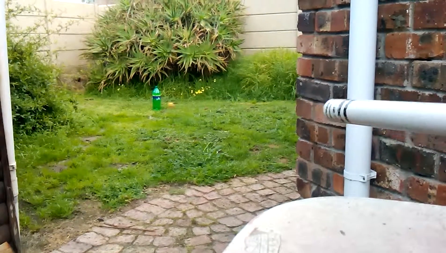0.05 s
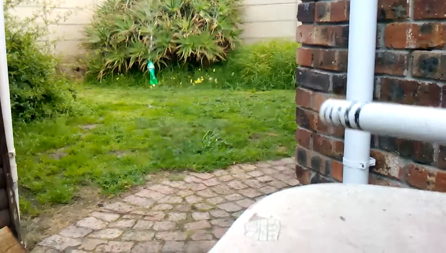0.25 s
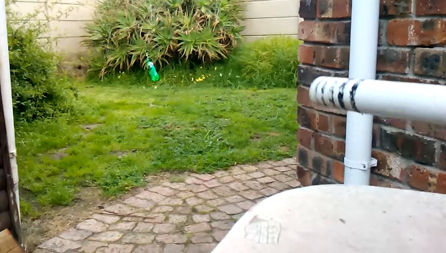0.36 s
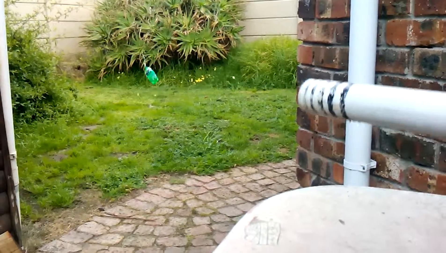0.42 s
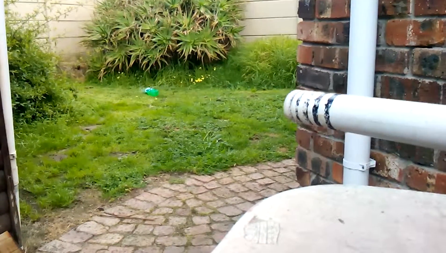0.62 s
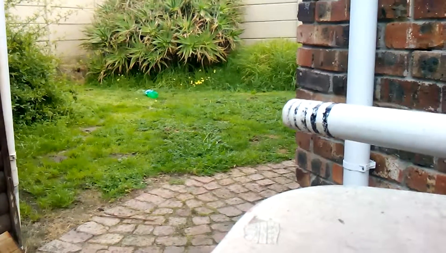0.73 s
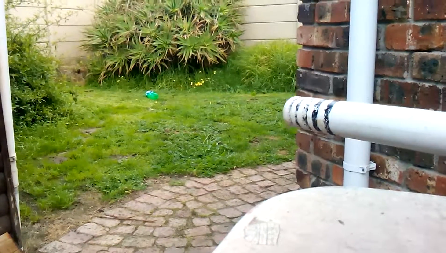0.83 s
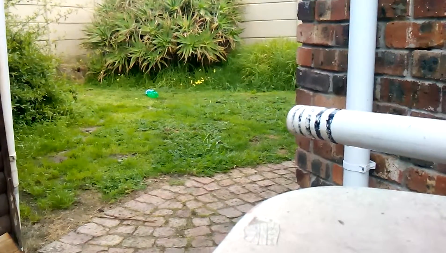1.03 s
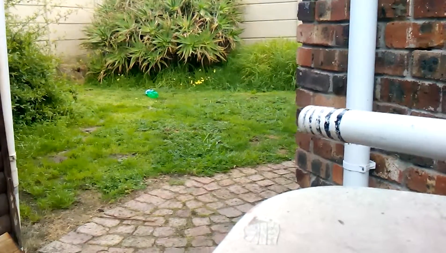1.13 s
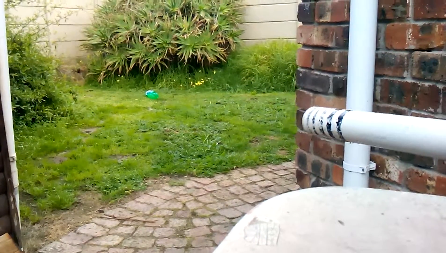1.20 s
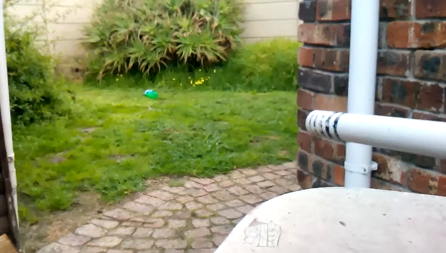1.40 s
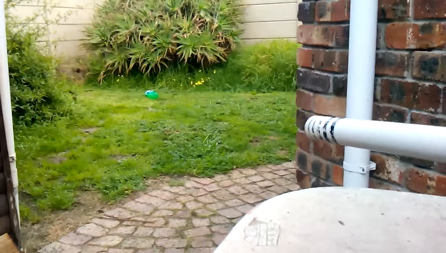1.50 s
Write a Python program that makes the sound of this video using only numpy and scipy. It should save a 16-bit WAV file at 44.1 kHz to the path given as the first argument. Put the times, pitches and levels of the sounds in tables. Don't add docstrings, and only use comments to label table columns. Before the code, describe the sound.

A homemade gas cannon fires with a sharp snap and overloaded boom, then pipe thumps and knocks

```python
import sys
import numpy as np
from scipy import signal
from scipy.fft import rfft, irfft
from scipy.io import wavfile
from scipy.ndimage import uniform_filter1d

SR = 44100
rng = np.random.default_rng(int(sys.argv[2]) if len(sys.argv) > 2 else 0)


def convert_level_to_amplitude(level_db):
    exponent = np.asarray(level_db, float) / 20
    return 10 ** exponent


def transcribe(u):
    v = np.clip(np.atleast_2d(u).T, -1, 1)
    q = np.round(v * 32767).astype(np.int16)
    wavfile.write(sys.argv[1], SR, q)


N = 68355

SPARK_S, MUZZLE_S = 0.1475, 0.2386
HIT_T = np.arange(SR // 5) / SR


def read(table, x):
    rows = np.array(table, float)
    return np.interp(x, rows[:, 0], rows[:, 1])


def unit(x):
    return x / np.sqrt(np.mean(x ** 2) + 1e-18)


def band(x, hz, width_hz):
    hz = min(hz, 0.45 * SR)
    return signal.lfilter(*signal.iirpeak(hz, hz / min(width_hz, 3.5 * hz), fs=SR), x)


def fade(t, t60):
    return (t >= 0) * np.exp(-np.log(1000) * np.maximum(t, 0) / t60)


def gate(t, start, length):
    return np.sqrt(np.clip(np.minimum(t - start, start + length - t) / 0.005, 0, 1))


def walk(rate):
    k = int(SR / rate)
    return unit(uniform_filter1d(uniform_filter1d(rng.standard_normal(N), k), k))


def coloured(points, flicker_db, rate):
    hz = np.maximum(np.arange(N // 2 + 1) * SR / N, 1)
    point_hz, point_db = np.transpose(points)
    gain = convert_level_to_amplitude(np.interp(np.log(hz), np.log(point_hz), point_db))
    half_octave = 2 * np.log2(hz / 20)
    out = 0
    for k in range(21):
        share = np.clip(1 - np.abs(half_octave - k), 0, 1)
        noise = irfft(rfft(rng.standard_normal(N)) * gain * np.sqrt(share), N)
        out = out + noise * convert_level_to_amplitude(flicker_db * walk(rate))
    return unit(out)


def add(out, start, sound):
    i = int(start * SR)
    out[i:i + len(sound)] += sound[:N - i]


# pitch in Hz, level in dB per Hz.
YARD_COLOUR = [(25, -12), (200, -2), (320, -8), (800, -17), (1250, -18), (1600, -31), (4000, -39),
               (9500, -35.5), (16000, -39)]


def yard_air(t):
    hum = convert_level_to_amplitude(-51) * coloured(YARD_COLOUR, 1.5, 11)
    hiss = convert_level_to_amplitude(-65.5) * (t > SPARK_S) * unit(band(rng.standard_normal(N), 7000, 9000))
    return hum + hiss


# start in seconds, length in seconds, level in dB.
CHIRPS = [(0, 0.0066, -58), (0.023, 0.016, -64.5), (0.053, .008, -67), (0.072, .008, -73),
          (.126, .016, -67), (0.795, 0.038, -61), (0.823, 0.024, -61), (0.866, 0.025, -60),
          (.896, 0.032, -64.5), (.934, .024, -65), (1.001, .025, -67.5), (1.032, .022, -60),
          (1.076, .018, -61.5), (1.105, .05, -66), (1.166, 0.019, -61.5), (1.198, .022, -64),
          (1.265, .028, -69), (1.294, 0.051, -63), (1.368, .028, -62.5), (1.406, .02, -67),
          (1.43, .024, -65), (1.468, .02, -67), (1.508, .035, -68)]


def insect_chirps(t):
    insect_hz = 8900
    throb = sum(convert_level_to_amplitude(db) * gate(t, start, length) for start, length, db in CHIRPS)
    return throb * unit(band(band(rng.standard_normal(N), insect_hz, 300), insect_hz, 500))


# start in seconds,
# peak in dB, centre in Hz, time to fall 60 dB in seconds.
TICKS = [(0.1466, -10.5, 3870, 0.0032), (.1497, -6, 10200, 0.01), (0.1556, -7.5, 10100, 0.015),
         (0.2387, 10, 3170, 0.022), (.8175, -27, 3300, .16), (1.287, -39, 3000, .008),
         (0.3125, -12, 11000, 0.008), (0.337, -7.5, 8700, 0.011), (.386, -16, 8000, 0.0083),
         (.4525, -15, 4000, 0.0059), (0.4698, -6, 6300, 0.013), (0.4702, 2, 1660, 0.023),
         (0.621, -4.5, 1160, 0.035), (0.7695, -13, 1600, 0.037), (0.506, -20, 6850, 0.037),
         (.541, -16, 7950, 0.0052), (.574, -20, 8000, 0.017), (0.592, -9, 6500, 0.023),
         (0.602, -4.5, 7450, 0.0061), (0.6191, -10.5, 4900, 0.036), (0.625, -28.5, 6150, 0.23),
         (0.6687, -25.5, 5130, 0.19), (.7245, -23.5, 6000, 0.031), (0.7356, -10, 3000, 0.0038),
         (0.7458, 0, 8500, 0.014), (0.761, -15.5, 3120, 0.058), (0.772, -23, 6500, 0.013),
         (.7755, -19, 5200, 0.0084), (.787, -39, 7000, .008), (.8172, -23.5, 3960, 0.015),
         (.863, -29, 3500, 0.0061), (1.05, -41.5, 5050, 0.011), (1.1925, -29.5, 2200, 0.04),
         (1.011, -36.5, 2500, 0.018), (.5912, -2, 2800, .012), (1.3033, -31.5, 9100, 0.013)]


def rattle_ticks():
    out = np.zeros(N)
    snap = convert_level_to_amplitude(3.5) * fade(HIT_T, 0.003)
    for start, db, hz, t60 in TICKS:
        width_hz = 1.95 * hz
        noise = rng.standard_normal(len(HIT_T))
        click = unit(band(band(noise, hz, width_hz), hz, width_hz))
        add(out, start, convert_level_to_amplitude(db - 15.5) * click * (fade(HIT_T, t60) + snap))
    return out


def ignition(t):
    flame_s, rise_s, fall_s = 0.196, 0.024, 0.014
    hiss = unit(band(rng.standard_normal(N), 9000, 12000)) * convert_level_to_amplitude(1.5 * walk(600))
    rush = unit(band(rng.standard_normal(N), 380, 900))
    in_bore = t < MUZZLE_S
    swell = np.clip((t - flame_s) / rise_s, 0, 1) ** 2
    fall = np.exp(-np.clip(t - flame_s - rise_s, 0, 1) / fall_s)
    spark = convert_level_to_amplitude(-29) * (hiss + convert_level_to_amplitude(-10) * rush) * fade(t - SPARK_S, 0.21)
    flame = convert_level_to_amplitude(-18.5) * swell * (hiss * fall + convert_level_to_amplitude(-11) * rush * in_bore)
    early_rush = convert_level_to_amplitude(-31) * rush * (t > 0.199) * in_bore
    return spark + flame + early_rush


def gas_burst(t, start, hold, parts, crackle_db):
    out = np.zeros(N)
    for hz, width_hz, db, t60 in parts:
        ring = unit(band(band(rng.standard_normal(N), hz, width_hz), hz, 2 * width_hz))
        shape = (t > start) * fade(np.maximum(t - start - hold, 0), t60)
        out += convert_level_to_amplitude(db - 9.5 + 1.5 * walk(69) + crackle_db) * ring * shape
    return out


# pitch in Hz, width in Hz, level in dB, time to fall 60 dB in seconds.
BORE = [(146, 160, -13.5, 0.8), (320, 78, -5, 0.58), (410, 220, 5.5, 0.42), (570, 240, 3, 0.36),
        (758, 320, -5, .35), (1065, 430, 0.5, 0.23)]


def bore_boom(t):
    return gas_burst(t, 0.2313, 0.026, BORE, 0)


# pitch in Hz, width in Hz, level in dB, time to fall 60 dB in seconds.
JET = [(2400, 890, -0.5, .11), (3620, 1500, -0.5, 0.22), (6500, 10000, -12, 0.28), (11600, 4400, -7.5, .1)]


def muzzle_jet(t):
    return gas_burst(t, MUZZLE_S, 0.021, JET, 3 * walk(1200))


# time in seconds, level in dB.
ECHO = [
    (.24, -13.5),
    (.3, -14),
    (.38, -14.5),
    (.447, -14.5),
    (.475, -25.5),
    (.55, -26),
    (.7, -39.5),
    (.9, -48.5),
    (1.2, -87.5),
]
# pitch in Hz, level in dB per Hz.
ECHO_COLOUR = [(35, -39), (60, -10.5), (376, -3.5), (688, -9.5), (1100, -0.5), (1870, -17.5), (3670, -19.5),
               (6710, -43.5), (15500, -41.5)]


def far_walls(t):
    return convert_level_to_amplitude(read(ECHO, t)) * (t > MUZZLE_S) * coloured(ECHO_COLOUR, 1.5, 60)


# time in seconds, level in dB.
HANDS = [(.44, -17), (.49, -26.5), (.56, -26.5), (.64, -29), (.71, -33), (.79, -33.5), (.85, -25.5),
         (.92, -37), (.96, -29), (1.005, -32), (1.04, -27.5), (1.09, -34), (1.13, -32), (1.152, -48.5),
         (1.225, -26), (1.26, -45.5), (1.33, -47), (1.42, -50), (1.55, -48)]
# pitch in Hz, level in dB per Hz.
HANDS_COLOUR = [(30, -24), (90, -14), (135, 0), (190, -10), (275, -4), (520, -11), (1150, -22), (1700, -39),
                (5000, -62)]


def hands(t):
    onset = np.clip((t - 0.42) / 0.012, 0, 1)
    return convert_level_to_amplitude(read(HANDS, t)) * onset * coloured(HANDS_COLOUR, 3, 50)


# start in seconds, peak in dB, first pitch in Hz, swell in seconds.
THUMPS = [(0.448, -9, 330, 0.0068), (0.4587, 5.5, 380, 0.0014), (0.4737, 5, 373, 0.0021),
          (0.5132, -8, 220, 0.0042), (0.574, -13, 377, 0.00088), (0.5785, -3, 287, 0.0018),
          (0.5911, 1, 455, 0.0026), (0.5921, 1.5, 345, 0.0044), (0.6245, -2, 330, 0.0016),
          (0.7252, -5, 330, 0.0022), (0.722, -16, 400, 0.0024), (.748, -11.5, 296, 0.0025),
          (.776, -16, 230, 0.0028), (0.804, -18, 260, .003), (.934, -27, 380, .004),
          (1.018, -24.5, 330, 0.0032), (1.033, -26, 343, 0.0033), (0.7367, -4.5, 293, 0.0041),
          (0.7608, -4.5, 594, 0.0019), (0.768, -9.5, 309, 0.005), (1.23, -31, 330, 0.018),
          (0.823, -18.5, 329, 0.0094), (0.844, -15.5, 257, 0.0018), (0.893, -26, 389, 0.009),
          (1.012, -18, 473, 0.0027), (1.096, -20, 499, 0.0039), (1.118, -19, 505, 0.0022),
          (1.279, -23.5, 324, 0.0046), (1.323, -37.5, 110, .012), (0.877, -23.5, 202, 0.0048),
          (1.303, -24.5, 390, 0.0035)]


def pipe_thumps():
    out, t = np.zeros(N), HIT_T
    sag_s, rest_share = 0.0055, 0.24
    legs = convert_level_to_amplitude(-19.5) * np.sin(2 * np.pi * 77.5 * t * (1 + 8.6 * t)) * fade(t, 0.29)
    for start, db, hz, swell_s in THUMPS:
        turns = hz * (rest_share * t + (1 - rest_share) * sag_s * (1 - np.exp(-t / sag_s)))
        swell = (t / swell_s * np.exp(1 - t / swell_s)) ** 1.7
        boom = convert_level_to_amplitude(db / 2) * legs
        add(out, start, convert_level_to_amplitude(db) * (boom - swell * np.sin(2 * np.pi * turns)))
    return out


# start in seconds, peak in dB, brightness in dB per octave.
KNOCKS = [(0.591, -22, 10.5), (.671, -29.5, 12.5), (0.7204, -29.5, 6), (0.7356, -24, 4), (.7615, -21, 1),
          (1.302, -29, -3), (0.8171, -28, 4), (1.0112, -25.5, 0.5), (.892, -29, -1.5), (1.098, -33, -2),
          (1.117, -33, -1.5), (1.1582, -15, -7), (1.1926, -15, 1.5), (1.2025, -30.5, -1.5),
          (1.2099, -26, 2), (1.439, -37, 1), (.934, -41, 0), (1.3085, -40, -0.5)]
# pitch in Hz, level in dB, time to fall 60 dB in seconds.
TABLE_TOP = [(202, -23, 0.15), (330, 2.5, 0.033), (503, 9.5, 0.027), (735, 8, 0.023), (1060, 6, 0.022),
             (1392, -6, 0.022), (1930, -9, 0.011)]


def table_knocks():
    out, t = np.zeros(N), HIT_T
    soft = np.sin(np.pi / 2 * np.minimum(t / 0.001, 1)) ** 2
    for start, db, tilt_db in KNOCKS:
        hollow_hz = 1100 * convert_level_to_amplitude(tilt_db)
        body = rng.standard_normal(len(t))
        for width in (0.68, 1.34, 1.9):
            body = band(body, hollow_hz, width * hollow_hz)
        add(out, start, convert_level_to_amplitude(db - 12.5) * unit(body) * fade(t, 0.056) * soft)
        for hz, mode_db, t60 in TABLE_TOP:
            detune, size_db = rng.standard_normal(2)
            gain = convert_level_to_amplitude(db - 7.5 + mode_db + tilt_db * np.log2(hz / 500) + size_db)
            tone = np.sin(2 * np.pi * hz * (1 + 0.02 * detune) * t)
            add(out, start, -gain * fade(t, t60) * soft * tone)
    return out


# start in seconds, level in dB, best excited pitch in Hz.
RINGS = [
    (.8172, -42, 2900),
    (1.0115, -49, 3000),
]
# pitch in Hz, level in dB, time to fall 60 dB in seconds.
FITTING = [(2100, -3, 0.23), (2800, -18, 0.039), (3200, -8, 0.2), (3660, -17, 0.099), (3800, -10, 0.06)]


def fitting_rings():
    out, t = np.zeros(N), HIT_T
    for start, db, near_hz in RINGS:
        for hz, mode_db, t60 in FITTING:
            gain = convert_level_to_amplitude(db + mode_db - 21 * abs(np.log(hz / near_hz)))
            rough = 0.68 * unit(band(rng.standard_normal(len(t)), hz, 150))
            add(out, start, gain * fade(t, t60) * (np.sin(2 * np.pi * hz * t) + rough))
    return out


# start in seconds, length in seconds, pitch in Hz, level in dB.
BIRD = [
    (.975, .03, 2050, -58),
    (1.1, .018, 1960, -55),
    (1.116, .037, 2030, -51),
]


def bird(t):
    out = np.zeros(N)
    wobble = np.cumsum(1 + 0.0055 * walk(120)) / SR
    for start, length, hz, db in BIRD:
        swell = np.sin(np.pi * np.clip((t - start) / length, 0, 1) ** 0.74)
        out += convert_level_to_amplitude(db) * swell * np.sin(2 * np.pi * hz * wobble)
    return out


# start in seconds, length in seconds.
BUZZ = [
    (1.145, .049),
    (1.208, 0.051),
    (1.29, .05),
    (1.348, .022),
]


def buzzing_insect(t):
    tone = np.sin(2 * np.pi * 10620 * t + 1.5 * walk(40))
    strokes = convert_level_to_amplitude(2 * walk(60)) * tone * np.cos(2 * np.pi * 225 * t)
    return convert_level_to_amplitude(-62) * strokes * sum(gate(t, *call) for call in BUZZ)


def leaves(t):
    low = unit(band(rng.standard_normal(N), 2260, 1700))
    high = unit(band(rng.standard_normal(N), 10200, 1800))
    rise = np.clip((t - 1.3) / 0.25, 0, 1)
    return convert_level_to_amplitude(-58 + 2 * walk(20)) * rise * (low + convert_level_to_amplitude(-4.5) * high)


def near_wall(sound):
    lag = np.arange(SR // 10) / SR
    wall = rng.standard_normal(len(lag)) * fade(lag - 0.002, 0.076)
    wall = wall / np.sqrt(np.sum(wall ** 2))
    return convert_level_to_amplitude(-17) * signal.fftconvolve(sound, wall)[:N]


def scene():
    t = np.arange(N) / SR
    garden = yard_air(t) + insect_chirps(t) + bird(t) + buzzing_insect(t) + leaves(t)
    shot = ignition(t) + bore_boom(t) + muzzle_jet(t) + far_walls(t)
    recoil = rattle_ticks() + pipe_thumps() + table_knocks() + fitting_rings()
    return (garden + shot + recoil + near_wall(recoil) + hands(t))[None]


def band_limit(x):
    return signal.sosfilt(signal.butter(12, 16780, fs=SR, output="sos"), x)


def record(dry):
    x = signal.sosfilt(signal.butter(1, 35, "high", fs=SR, output="sos"), dry)
    x = np.clip(x, -1.01, 1.01)
    x = signal.sosfilt(signal.ellip(8, 0.2, 50, 15900, fs=SR, output="sos"), x)
    return band_limit(np.clip(x, -1, 1))


dry = scene()
out = record(dry)
transcribe(out)
```